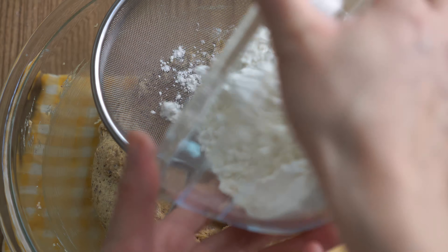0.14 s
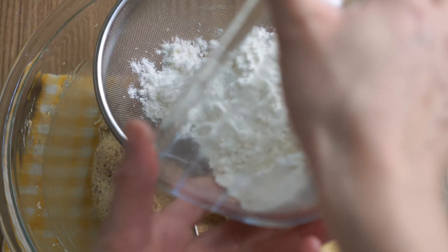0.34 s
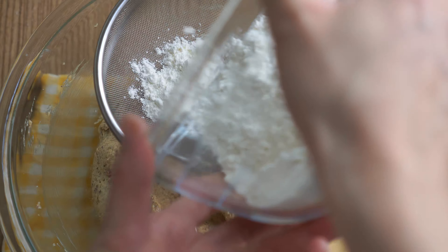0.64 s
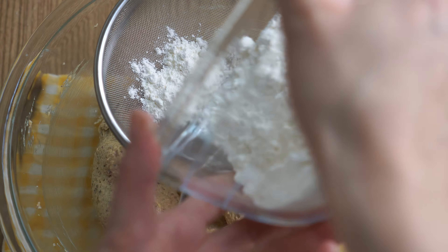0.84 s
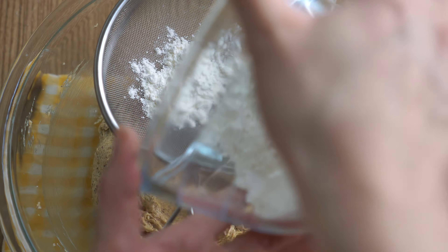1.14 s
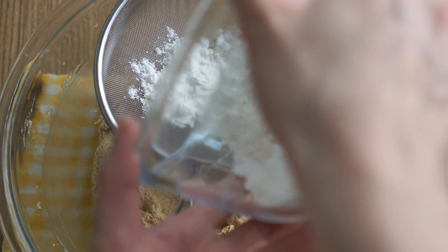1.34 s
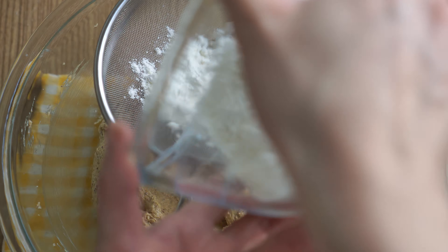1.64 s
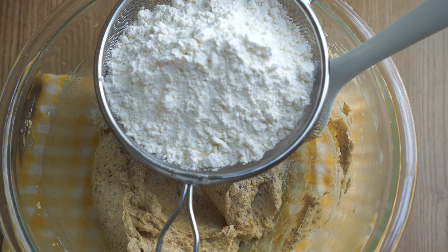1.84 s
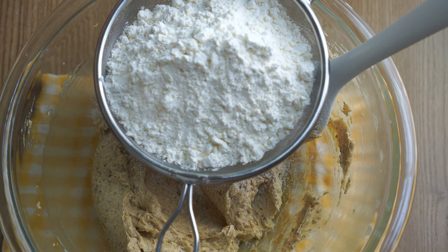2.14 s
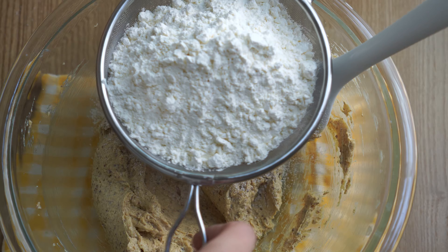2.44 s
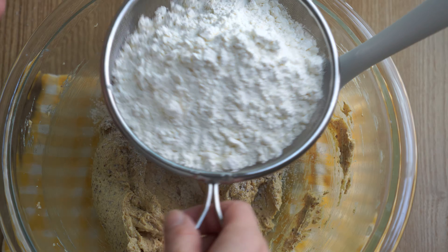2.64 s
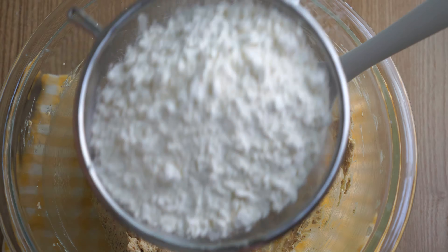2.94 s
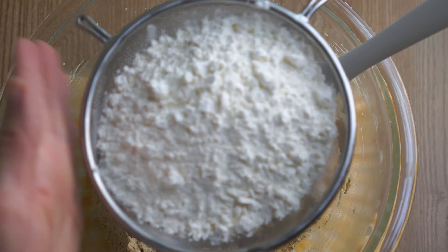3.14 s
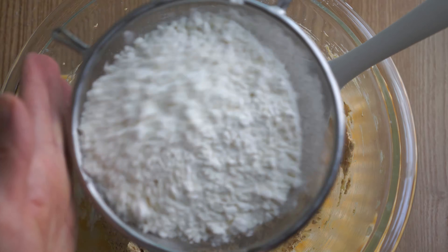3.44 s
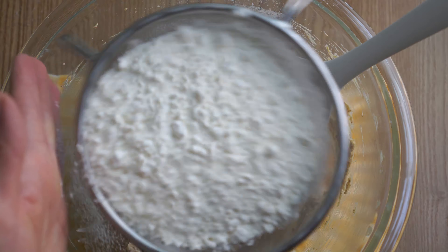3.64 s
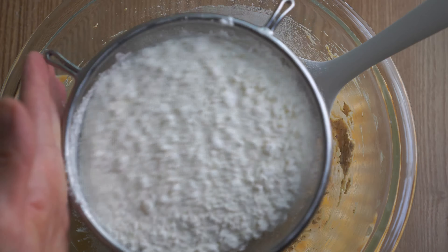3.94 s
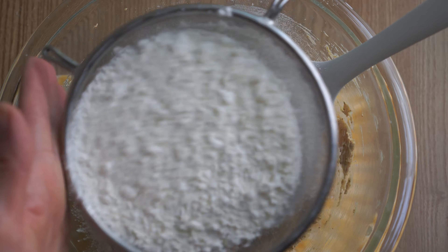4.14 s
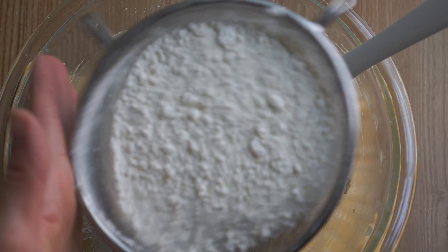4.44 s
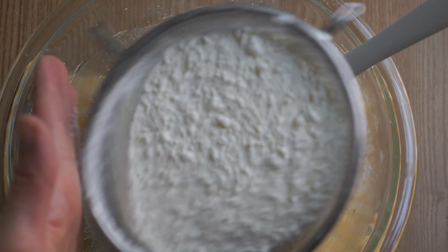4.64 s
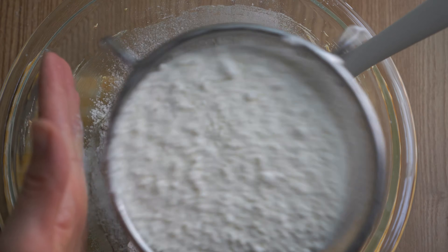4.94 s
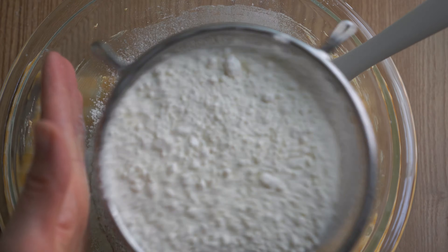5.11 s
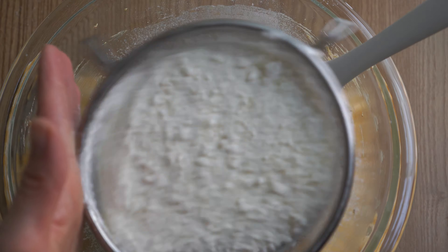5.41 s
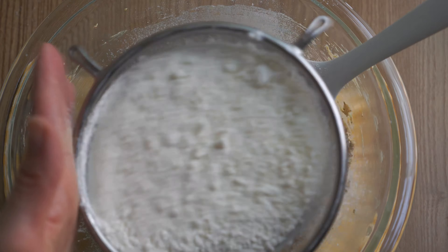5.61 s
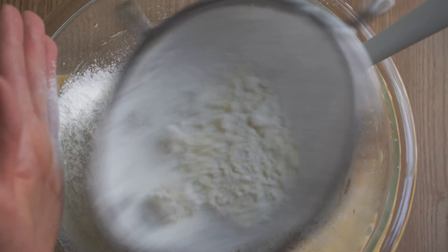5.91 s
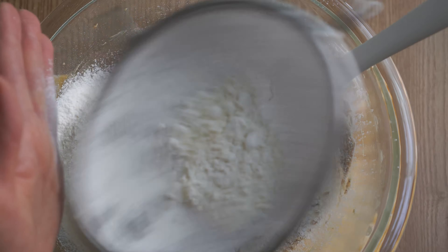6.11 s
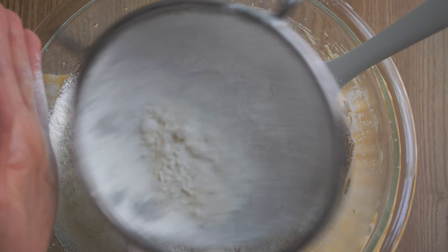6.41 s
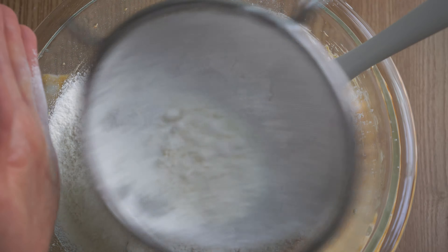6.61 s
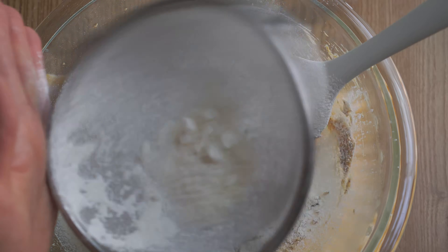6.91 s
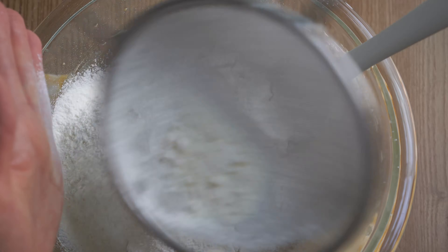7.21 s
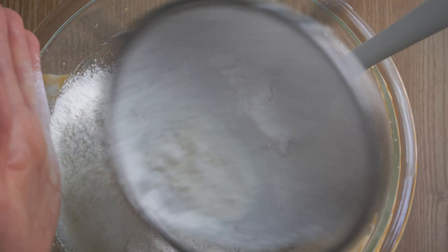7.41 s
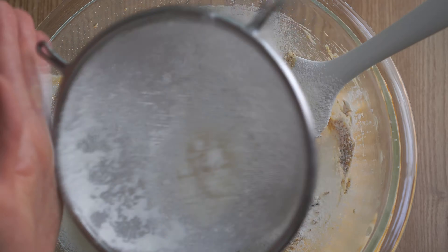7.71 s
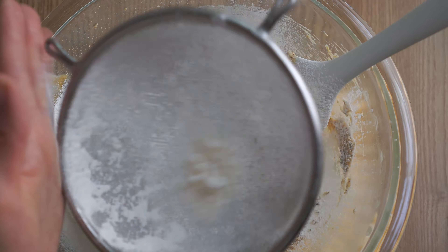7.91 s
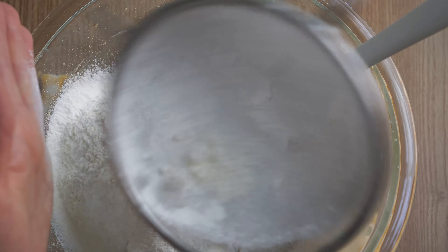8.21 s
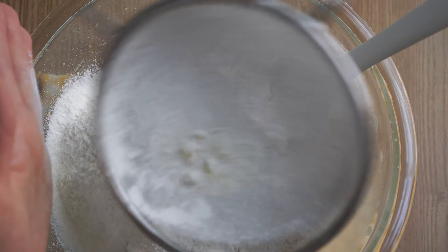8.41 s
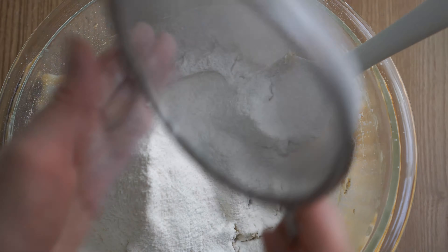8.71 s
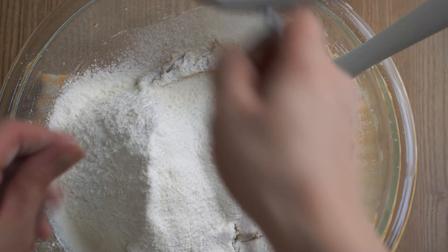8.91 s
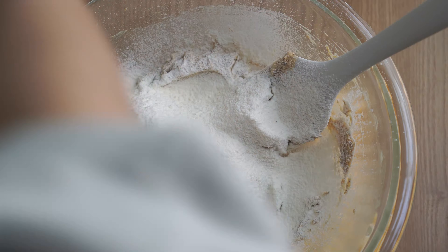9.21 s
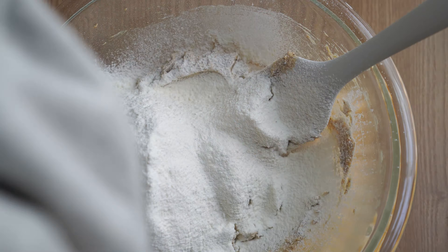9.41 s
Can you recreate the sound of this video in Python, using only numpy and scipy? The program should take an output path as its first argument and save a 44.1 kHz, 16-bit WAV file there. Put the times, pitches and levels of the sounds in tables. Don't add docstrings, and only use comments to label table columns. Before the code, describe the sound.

Quiet room air with a faint thin whine, and glass touched lightly. A violent wooden slam overloads the microphone, and glasses shiver thinly. Then a regular, fast metal rattle begins: rim slapping skin, mesh buzzing, flour whispering. Midway the strokes become sharp and jangling over a low worktop hum. They stop abruptly; soft skin and cloth rubs follow, then a small steel clink and a low thud, heard very close in a small kitchen.

```python
import sys
import numpy as np
from scipy import signal
from scipy.fft import rfft, irfft
from scipy.io import wavfile
from scipy.ndimage import uniform_filter1d

SR = 44100
rng = np.random.default_rng(int(sys.argv[2]) if len(sys.argv) > 2 else 0)


def field_ratio(decibels):
    return 10 ** (np.asarray(decibels, dtype=float) / 20)


def unload_audio(sound):
    columns = np.transpose(np.atleast_2d(sound))
    steps = np.round(np.clip(columns, -1, 1) * 32767)
    wavfile.write(sys.argv[1], SR, steps.astype(np.int16))


N = 421155
T = np.arange(N) / SR


def unit(x):
    return x / np.sqrt(np.mean(x ** 2))


def body(x, peaks):
    out = 0
    for k, (hz, width_hz, db) in enumerate(peaks):
        b, a = signal.iirpeak(hz, hz / width_hz, SR)
        out = out + (-1) ** k * field_ratio(db) * signal.lfilter(b, a, x)
    return out


def noisy(peaks):
    return unit(body(rng.standard_normal(N), peaks))


def butterworth(x, order, hz, kind="low"):
    return signal.sosfilt(signal.butter(order, hz, kind, fs=SR, output="sos"), x)


def fade(x, t60):
    return signal.lfilter([1], [1, -np.exp(-np.log(1000) / (t60 * SR))], x)


def strikes(times, gains):
    x = np.zeros(N)
    np.add.at(x, (np.asarray(times) * SR).astype(int), gains)
    return x


def walk(rate_hz):
    k = int(SR / rate_hz)
    stairs = np.repeat(rng.standard_normal(N // k + 1), k)
    return unit(uniform_filter1d(uniform_filter1d(stairs, k), k)[:N])


def wavering_tone(hz, depth, rate_hz):
    return np.sqrt(2) * np.sin(2 * np.pi * np.cumsum(hz * (1 + depth * walk(rate_hz))) / SR)


def swells(rows, rise_s=1., fall_s=1.):
    t, power = T[::32], 0
    for row in rows:
        start, end, db, rise, fall = (*row, rise_s, fall_s)[:5]
        before = np.maximum(start - t, 0) / rise
        after = np.maximum(t - end, 0) / fall
        power = power + field_ratio(db - 20 * before - 20 * after) ** 2
    return np.interp(T, t, np.sqrt(power))


# pitch_hz, level_db (per Hz)
AIR = [(31, -28.5), (52, 3.5), (80, -12.5), (243, -12), (309, -16), (349, -13.5), (454, -21.5),
       (578, -19.5), (2510, -37), (2830, -39.5), (7250, -46.5), (9010, -47.5), (16400, -54.5)]
# start_s, end_s, level_db, and if not shared rise_s, fall_s
AIR_DB = [(0, 9.5, -45), (2.2, 2.5, -43), (6.5, 8.5, -43, 1.5, 1), (9, 9, -37.5),
          (9.55, 9.55, -37, 0.3, .3)]
# pitch_hz, level_db
WHINE = [(2444, -66.5)]
# start_s, end_s, level_db, rise_s, fall_s
WHINE_DB = [(0, 2.6, -5, .1, 1.1), (0, 9.55, -8.5, .1, .1)]


def air():
    hz = np.maximum(np.fft.rfftfreq(N, 1 / SR), 1)
    points = np.array(AIR)
    colour = field_ratio(np.interp(np.log(hz), np.log(points[:, 0]), points[:, 1]))
    rumble = unit(irfft(rfft(rng.standard_normal(N)) * colour, N))
    level = field_ratio(2.5) * swells(AIR_DB, rise_s=0.59, fall_s=0.75) * field_ratio(0.47 * walk(5))
    whine = swells(WHINE_DB) * sum(field_ratio(db) * noisy([(f, 20, 0)]) for f, db in WHINE)
    hiss = field_ratio(-81) * noisy([(13100, 6500, 0)])
    return level * rumble + whine + hiss


# start_s, end_s, level_db, and if not shared rise_s, fall_s
HUM = [(6.02, 6.25, -39.5), (6.48, 6.98, -30.5), (7.346, 7.5, -25.5), (8, 8, -34.5, .3, 0.2),
       (8.32, 8.68, -32.5, .15, .11), (8.9, 9.0, -41, 0.5, .08)]
SWAY = [(0, 9.55, -43), (1.1, 1.15, -41), (2.3, 2.7, -38, .2, .3), (6.46, 7.2, -36), (7.6, 7.6, -34),
        (8.2, 8.7, -34.5, 1.5, .4)]
ROCK = [(1.935, 2.09, -25, .03, .3), (2.13, 2.21, -17.5, .08, .25)]
STIR = [(3.47, 3.47, -45.5), (4.18, 4.18, -50.5), (4.52, 4.5, -47, .07, 0.2), (5.65, 5.6, -51.5),
        (6.1, 7.5, -51.5), (8.09, 8.6, -44.5), (9, 10, -43, .1, 0.5)]
# pitch_hz, width_hz, level_db
STIR_MODES = [(167, 16, -14), (217.4, 13.6, -10), (349.6, 40, -9.5)]


def worktop():
    hum = wavering_tone(63.9, 0.02, 12) * field_ratio(0.75 * walk(9)) + field_ratio(-7) * noisy([(61, 26, 0)])
    shaking = swells(HUM, rise_s=0.38, fall_s=0.52)
    upper = np.sqrt(shaking) * noisy([(101, 21, 1), (131, 17, -0.5), (178, 24, -5.5), (230, 23, -11.0)])
    sway = unit(body(noisy([(31.8, 29, 0)]), [(34.0, 19.5, 0)]))
    sway = field_ratio(-2.5) * swells(SWAY, rise_s=1.5, fall_s=1.6) * sway
    rock_hz, crest_s = 18.6, 2.143
    turn = 2 * np.pi * rock_hz * (T - crest_s)
    rock = swells(ROCK) * (np.cos(turn) + field_ratio(-7) * np.cos(2 * turn))
    stir = swells(STIR, rise_s=0.55, fall_s=0.44) * noisy(STIR_MODES)
    return rock + shaking * hum + field_ratio(-29.5) * upper + sway + stir


def strokes(tables, kinds):
    taps = []
    for rows, (rim_db, palm_db, wires_db, loss, drift_db, ms, *graze) in zip(tables, kinds):
        mid_s, mid_db = np.mean(rows, axis=0)[:2]
        for s, db, *own_ms in rows:
            lost_db = loss * (db - mid_db)
            palm_now_db = palm_db - lost_db + drift_db * (s - mid_s)
            taps.append((s, db, rim_db - lost_db, palm_now_db, (*own_ms, ms)[0], wires_db, *graze))
    return taps


# pitch_hz, width_hz, level_db
MESH = [(8140, 700, -1.5), (9550, 1180, -2)]
WIRES = [(5560, 560, -0.38), (6720, 840, -2.6)]
TOP = [(11440, 1550, 0.5), (13300, 2000, -6.5), (15000, 1300, -9.5)]
SCATTER = [(8300, 5000, 0)]
FLOUR = [(8200, 2700, 0.79), (9940, 1900, -1.9)]
DUST = [(5200, 3500, 0.5), (12000, 4500, -1.5)]


def sieve(taps, rim, palm, dust_db, grit_db, echo_db, scatter_db, scatter_t60, sift_db, sift_t60, ping_db):
    s, energy_db, rim_db, palm_db, ms, wires_db, graze_ms, graze_db = np.array(taps, float).T[:, :, None]
    early = 260
    t_ms = (np.arange(2000) - early) * 1000 / SR

    def touch(delay_ms, rise_ms):
        u = np.maximum(t_ms - delay_ms, 0) / rise_ms
        return u * np.exp(-u)

    rise = np.maximum(ms, .15)
    graze = field_ratio(graze_db) * touch(-graze_ms, 1.0)
    bounce = field_ratio(echo_db) * touch(4.8, np.maximum(rise, .9))
    contact = graze + touch(0, rise) + bounce
    grit = field_ratio(grit_db * rng.exponential(size=contact.shape))
    contact = contact * rng.standard_normal(contact.shape) * grit

    rattle = 0
    for peaks, db in ((MESH, 0), (WIRES, wires_db), (TOP, -9.5), (rim, rim_db), (palm, palm_db)):
        part = 0
        for k, mode in enumerate(peaks):
            uneven = field_ratio(2.2 * rng.standard_normal(ms.shape))
            part = part + (-1) ** k * uneven * body(contact, [mode])
        energy = np.sum(part ** 2, axis=1, keepdims=True) * 1000 / SR
        rattle = rattle + field_ratio(energy_db + db) * part / np.sqrt(energy)
    out = np.zeros(N + SR)
    np.add.at(out, (s * SR).astype(int) - early + np.arange(len(t_ms)), field_ratio(-1.03) * rattle)

    starts = uniform_filter1d(strikes(s[:, 0], field_ratio(energy_db[:, 0])), 150) * 150
    scatter = fade(starts, scatter_t60) / 150 * unit(body(noisy(SCATTER), SCATTER))
    flour = unit(body(noisy(FLOUR), FLOUR)) + field_ratio(dust_db) * noisy(DUST)
    sift = fade(starts, sift_t60) / 150 * flour
    hiss = (field_ratio(scatter_db) * scatter + field_ratio(sift_db) * sift) * field_ratio(2.4 * walk(150))
    springs = (rng.random(N) < 70 / SR) * rng.standard_normal(N)
    pings = fade(starts, 0.26) / 150 * body(springs, [(9350, 250, 0)])
    return out[:N] + hiss + field_ratio(ping_db) * pings


# start_s, energy_db (rattle, per ms), rim_db and
# palm_db (over rattle), contact_ms
TICKS = [(0.045, -56, 5, 14, 1.4), (0.1866, -52, -1.5, -4, 3.44), (1.807, -49.5, 1, 12, 0.17),
         (2.4115, -24.5, 4.5, 2, 2.3), (2.447, -35, 8, 5, 3.2), (2.478, -44, 5, 2.5, 2.1),
         (2.509, -48, 1.5, 2.5, 1.1), (6.0265, -38, -2, 3, .8), (6.049, -38, -3, -3, .8),
         (2.974, -29, -6, -5.5, 2.1), (3.018, -50, -4.6, 3, 2.41), (3.5121, -46, 0.1, 1.5, .64),
         (4.3811, -33, -3, 0, 0.49), (4.5447, -21.5, -12, -8, 0.82), (8.887, -45.5, -8, 0, 1.9),
         (9.5102, -37, -5, -7, 3.04)]
# wires_db (over rattle), graze_ms (early), graze_db
STRAY = (-5.5, 1.1, -40)
# start_s, energy_db (per ms), contact_ms
SLAPS_FULL = [(3.3837, -53, .63), (3.7338, -39, .61), (3.9105, -41.5, .65), (4.0963, -37.5, .53),
              (4.2808, -36, .78), (4.8481, -48, 3.2), (5.0386, -50, 1.43), (5.227, -45.7, 1.0),
              (5.4186, -35, .68), (5.6039, -35.4, 0.47), (5.784, -35, .8)]
# start_s, energy_db (per ms)
REBOUNDS_FULL = [(3.4085, -43), (3.585, -38), (3.7538, -37), (3.9314, -34), (4.1146, -37), (4.2996, -37.5),
                 (4.487, -40), (4.675, -38.5), (4.8734, -37), (5.0579, -36), (5.2455, -36), (5.4346, -35.5),
                 (5.622, -36), (5.8005, -33)]
RETURNS_FULL = [(3.4668, -46), (3.637, -45.4), (3.8268, -50), (3.9958, -43.5), (4.1812, -45),
                (4.3589, -42.4), (4.7533, -44.5), (4.9325, -46), (5.1242, -42.7), (5.3085, -44),
                (5.4987, -42), (5.6824, -40.5), (5.8678, -41)]
# rim_db, palm_db, wires_db (over rattle), loss (dB of rim and palm per dB of extra force),
# palm_drift (dB per s), contact_ms, graze_ms (early), graze_db
STROKES_FULL = [
    (-2.5, 2, -11, .2, -0.5, .55, 1.1, -40),
    (-8, -4, -3.5, 0, 0, 0.56, 1.1, -40),
    (-4.5, 5, -6, 0.5, 0.1, 1.1, 4.1, -8),
]
# pitch_hz, width_hz, level_db
RIM_FULL = [(2500, 800, -4.5), (3250, 500, 0.5), (3900, 500, -2.5), (4700, 600, -3)]
PALM_FULL = [(350, 145, -5), (720, 400, -6), (1150, 400, -5), (1650, 260, 0.5)]


def loaded_sieve():
    taps = strokes([SLAPS_FULL, REBOUNDS_FULL, RETURNS_FULL], STROKES_FULL)
    taps += [(*tick, *STRAY) for tick in TICKS]
    return sieve(taps, RIM_FULL, PALM_FULL, dust_db=-8, grit_db=4, echo_db=-18,
                 scatter_db=-22, scatter_t60=0.1, sift_db=-36, sift_t60=0.45, ping_db=12)


def clink(hits, modes):
    s, peak_db, crack_db = np.array(hits, float).T
    blow = strikes(s, field_ratio(peak_db))
    ring = 0
    for k, (hz, db, t60) in enumerate(modes):
        pole = np.exp(2j * np.pi * hz / SR - np.log(1000) / (t60 * SR))
        ring = ring + (-1) ** k * field_ratio(db) * signal.lfilter([1], [1, -pole], blow).imag
    cracks = strikes(s, field_ratio(peak_db + crack_db))
    crack = fade(cracks, 0.021) + field_ratio(-23) * fade(cracks, 0.41)
    return ring + crack * noisy([(980, 940, 4.0), (2310, 2800, -0.8), (8900, 2200, -4.0)])


# start_s, peak_db, crack_db (over ring)
BOWL_HITS = [
    [(.256, -31.5, -11)],
    [(0.262, -28.5, -4.5)],
    [(.386, -28.5, 0)],
    [(2.664, -22.5, 0)],
    [(2.585, -52, -20), (2.72, -54, -20)],
]
# pitch_hz, level_db, ring_s
BOWL = [
    [(682, 3.5, 0.048), (1410, -4, 0.13), (1712, -4, 0.061)],
    [(2664, -8, 0.16), (2950, -8, .03), (4080, -25, .19), (7531, -9.5, 0.095), (8150, -21, .11),
     (8662, -17, 0.074), (9400, -19, 0.098)],
    [(680, -2, 0.036), (1427, -6, 0.11), (1744, -2, 0.038), (2590, -14, 0.14), (2645, -19, 0.21),
     (2980, -11, .03), (5790, -28, 0.13), (7068, -21, .15), (8020, -11, .08)],
    [(550, -4, 0.063), (1090, 2.5, 0.02), (1450, -8, 0.089), (2632, -9, 0.17), (2640, -17, 0.17),
     (5800, -23, 0.12), (8145, -24, .08), (9335, -27, .08)],
    [(7531, 0, .08)],
]


def bowl_clinks():
    return sum(map(clink, BOWL_HITS, BOWL))


# start_s, end_s, level_db, rise_s, fall_s
RUBS = [(8.749, 8.76, -38.5, .003, .09), (8.956, 9.05, -46, .025, .03), (9.09, 9.105, -47, .05, 0.061),
        (9.07, 9.23, -54.5, .11, .15), (8.97, 9.2, -52, .05, .4), (1.688, 1.688, -54, .027, .11),
        (2.85, 2.85, -62, .3, .35), (8.8, 9.27, -54.5, 0.22, 0.25)]
# pitch_hz, width_hz
RUB_TONE = [(7650, 3800), (10900, 8300), (12000, 8300), (4600, 1000), (4870, 7100), (2570, 1500),
            (4800, 4000), (1140, 1000)]


def rubs():
    hiss = 0
    for row, tone in zip(RUBS, RUB_TONE):
        peak = [(*tone, 0)]
        hiss = hiss + swells([row]) * unit(body(noisy(peak), peak))
    return hiss * field_ratio(2.0 * walk(60))


# start_s, level_db, push_ms, swing_back_db
BLOWS = [
    (1.9734, 10, 1.01, -8.5),
    (2.0398, -2.5, 1.37, -0.5),
    (2.0604, -6, 1.8, 1),
    (2.664, -34, 0.63, 0.2),
]
# start_s, end_s, level_db, rise_s, fall_s
BOOMS = [(1.974, 2.085, -14, .002, 0.081), (2.16, 2.22, -23.5, 0.092, .2), (2.37, 2.45, -30.5, .18, .02),
         (2.412, 2.482, -23.5, .002, .1), (5.596, 5.4, -51, .4, .6)]
KNOCKS = [(1.974, 2.05, -15.5, .002, 0.13), (2.2, 2.41, -41, .2, .02), (2.414, 2.46, -24, .004, .11),
          (5.57, 5.62, -41, 0.073, .25)]
CLATTERS = [(1.974, 2.04, -39.5, .002, .13), (1.976, 1.98, -39.5, .002, .04), (2.26, 2.33, -57, .2, .3),
            (2.412, 2.4, -30, .002, 0.054), (2.43, 2.465, -39, .02, .14), (5.57, 5.62, -50, .09, .3)]
DRONE = [(2.09, 2.096, -18.5, .125, .13), (2.45, 2.52, -34, .15, .13)]
# pitch_hz, width_hz, level_db
BOOM = [(157, 51, -7.5), (226, 35, -2), (296, 81.5, -5), (411, 43.4, -4.5)]
KNOCK = [(517, 122, -0.5), (652, 68, 2.5), (792, 77, 1.5), (1110, 360, -9), (1660, 280, -14)]
CLATTER = [(1890, 1240, -0.5), (3140, 940, 1.5), (4630, 2000, -6), (8250, 2300, -11), (11000, 3400, -17.5)]


def door_bangs():
    push = np.zeros(N)
    for s, db, ms, back_db in BLOWS:
        u = np.arange(-.4, 2, 1000 / (ms * SR))
        suck = -.25 * np.sin(np.pi * u / u[0])
        swing = np.sin(np.pi * u) * field_ratio(back_db * (u > 1))
        start = int((s + u[0] * ms / 1000) * SR)
        push[start:][:len(u)] += field_ratio(db) * np.where(u < 0, suck, swing)
    push = butterworth(push, 2, 2600)
    boom = unit(butterworth(noisy(BOOM), 3, [125, 1500], "band"))
    knock = unit(butterworth(noisy(KNOCK), 3, 1900))
    clatter = unit(body(noisy(CLATTER), [(3000, 14000, 0)])) * field_ratio(2.2 * walk(120))
    tails = swells(BOOMS) * boom + swells(KNOCKS) * knock + swells(CLATTERS) * clatter
    drone = (T > BLOWS[0][0]) * swells(DRONE) * wavering_tone(151, 0.03, 24.84)
    return push + tails + drone


# pitch_hz, level_db
SHIVER = [(8016, -64.5), (9329, -66), (10664, -72), (12005, -74)]
# start_s, end_s, level_db, rise_s, fall_s
SHIVER_DB = [(2.27, 2.29, 3, .15, .12), (2.37, 2.41, 3, .05, .03), (2.45, 2.5, 0.5, .05, 0.1)]


def glass_shiver():
    return swells(SHIVER_DB) * sum(field_ratio(db) * noisy([(hz, 40, 0)]) for hz, db in SHIVER)


# start_s, end_s, level_db, rise_s, fall_s
SQUEAK = [
    (2.5, 2.6, -58, .08, .08),
    (9.457, 9.52, -45.5, .004, .09),
]


def hinge_squeak():
    return swells(SQUEAK) * wavering_tone(1720, 0.02, 90) * field_ratio(2.5 * walk(90))


# start_s, level_db
HOOK = [(6.148, 4), (6.344, 0), (7.321, -2), (8.11, -2), (8.511, 4), (8.706, 3), (4.488, -9)]


def hook():
    lag_s, gain_db = .0015, 25
    s, db = np.transpose([(s + lag_s, db + gain_db) for s, db in REBOUNDS_FULL] + HOOK)
    return body(strikes(s, field_ratio(db)), [(11500, 60, 0)])


# start_s, energy_db (per ms), contact_ms
SLAPS_EMPTY = [(6.0295, -32, 1.1), (6.034, -27.5, .7), (6.2195, -28, .8), (6.2238, -25.5, .7),
               (6.4142, -17.5, .72), (6.6062, -21.5, .6), (6.8045, -16.5, .45), (7.0002, -22.5, .45),
               (7.0047, -24.5, .7), (7.1932, -17, 0.65), (7.3897, -16, 0.32), (7.5866, -19.5, .4),
               (7.5917, -24.5, .7), (7.7865, -28.5, .6), (7.7924, -23.5, 0.53), (7.9817, -24, .5),
               (7.9875, -26.5, 0.64), (8.1823, -27, .8), (8.1875, -25, .6), (8.3833, -15, .5),
               (8.5725, -20, .8), (8.5772, -25, .6)]
# start_s, energy_db (per ms)
REBOUNDS_EMPTY = [(6.055, -20), (6.245, -18.5), (6.4407, -20), (6.6315, -18), (6.8301, -20.5),
                  (7.0254, -20), (7.218, -20), (7.4149, -20.5), (7.6133, -20.5), (7.8133, -24.5),
                  (8.009, -21.5), (8.2096, -18), (8.4114, -19), (8.5994, -19.5)]
RETURNS_EMPTY = [(5.9576, -26), (6.146, -25), (6.3424, -23), (6.5351, -24), (6.7324, -26.5),
                 (6.9317, -25.5), (7.124, -24.5), (7.319, -22.5), (7.5178, -23), (7.713, -23.5),
                 (7.9115, -23.5), (8.1086, -24.5), (8.3065, -27), (8.5102, -25), (8.7053, -25)]
STROKES_EMPTY = [
    (-9.5, -5, -8, 0.68, -1.5, 1.1, 1.1, -40),
    (-4, -9, -5, .25, -3, 1.07, 1.64, -7),
    (-3.5, -10, -3, .2, -5, 0.75, 3.0, -11),
]
# pitch_hz, width_hz, level_db
RIM = [(2700, 870, -8), (3460, 350, 3.5), (3830, 380, 2.5), (4710, 400, 1.5)]
PALM = [(348, 150, -5), (710, 500, -7), (1103, 473, 0.5), (1263, 330, -1), (1597, 224, -4)]


def empty_sieve():
    taps = strokes([SLAPS_EMPTY, REBOUNDS_EMPTY, RETURNS_EMPTY], STROKES_EMPTY)
    return sieve(taps, RIM, PALM, dust_db=-6, grit_db=3, echo_db=-13,
                 scatter_db=-22.5, scatter_t60=0.1, sift_db=-34.0, sift_t60=.36, ping_db=10)


# start_s, peak_db, crack_db (over ring)
RIM_HIT = [(9.455, -40.5, -2)]
# pitch_hz, level_db, ring_s
STEEL = [(4856, -4, 0.11), (5060, -16, .2), (6955, -11, 0.35), (9362, -4, .1), (9889, -10, .15),
         (10660, -14, .15), (12000, -20, .15)]


def rim_clink():
    return clink(RIM_HIT, STEEL)


# start_s, end_s, level_db, rise_s, fall_s
THUD = [
    (9.455, 9.483, -32.5, .04, .011),
    (9.49, 9.517, -14.5, .012, .018),
    (9.53, 9.55, -26, .011, .1),
]
# pitch_hz, width_hz, level_db
THUD_MODES = [(158, 48, 0.5), (243, 67, 6.5), (372, 53, 2.5), (600, 145, -5.5), (790, 140, -8.5),
              (960, 200, -18)]


def end_thud():
    return swells(THUD) * unit(butterworth(noisy(THUD_MODES), 3, 1150))


def scene():
    room = air() + worktop() + door_bangs() + glass_shiver() + hinge_squeak()
    sieving = loaded_sieve() + empty_sieve() + hook()
    bowl_and_hands = bowl_clinks() + rubs() + rim_clink() + end_thud()
    return (room + sieving + bowl_and_hands)[None]


def roll_off(x):
    return signal.sosfilt(signal.butter(12, 16600, fs=SR, output="sos"), x)


def record(dry):
    top = signal.ellip(8, .5, 70, 15750, fs=SR, output="sos")
    mix = np.clip(signal.sosfilt(top, dry), -1, 1)
    return roll_off(mix)


dry = scene()
out = record(dry)
unload_audio(out)
```